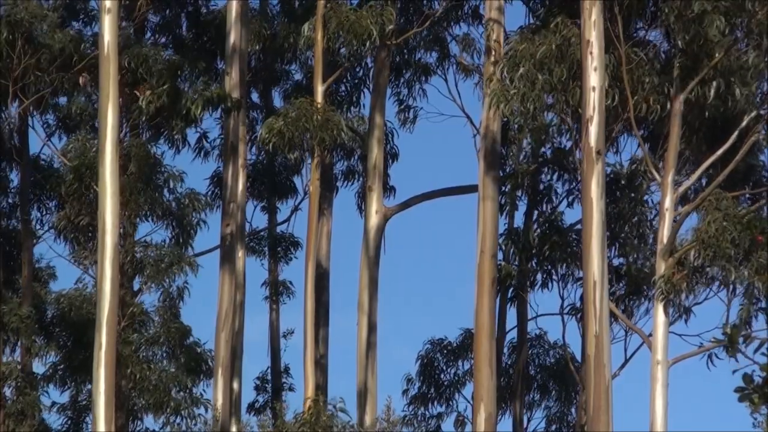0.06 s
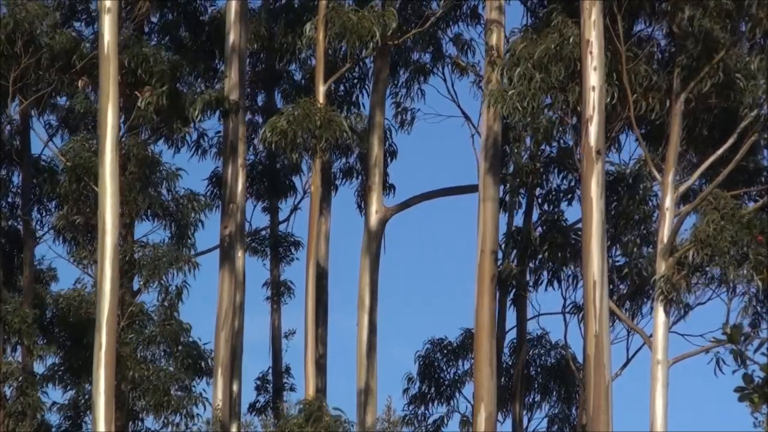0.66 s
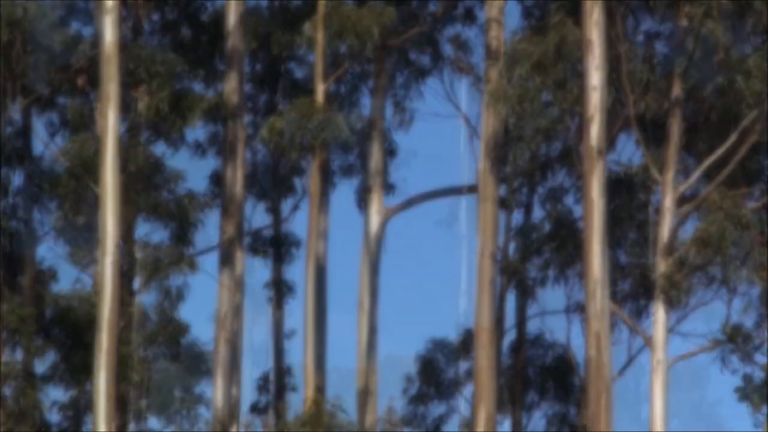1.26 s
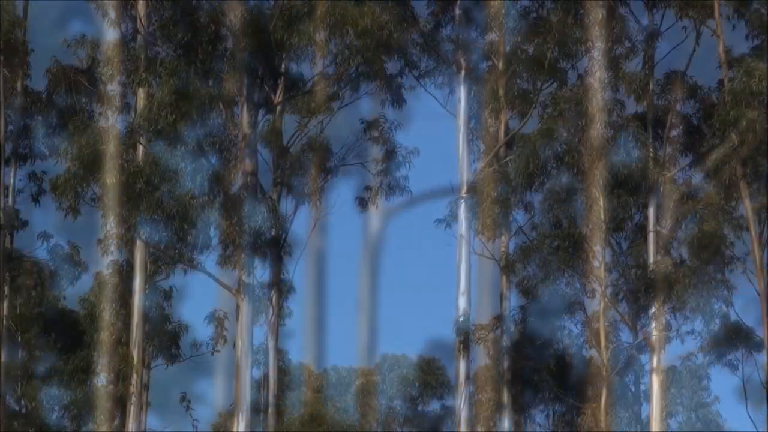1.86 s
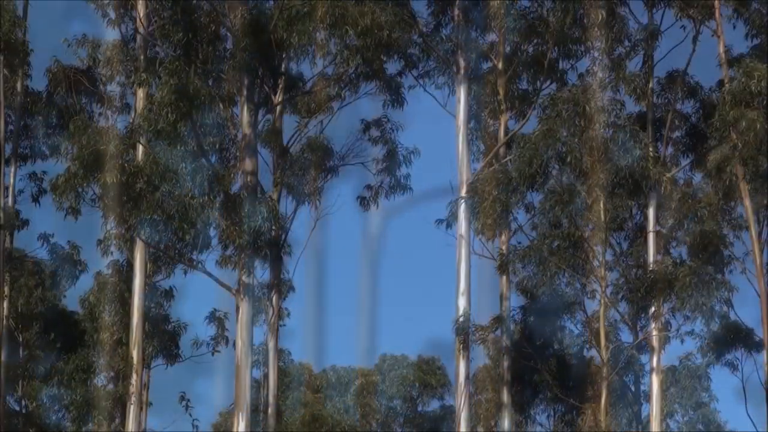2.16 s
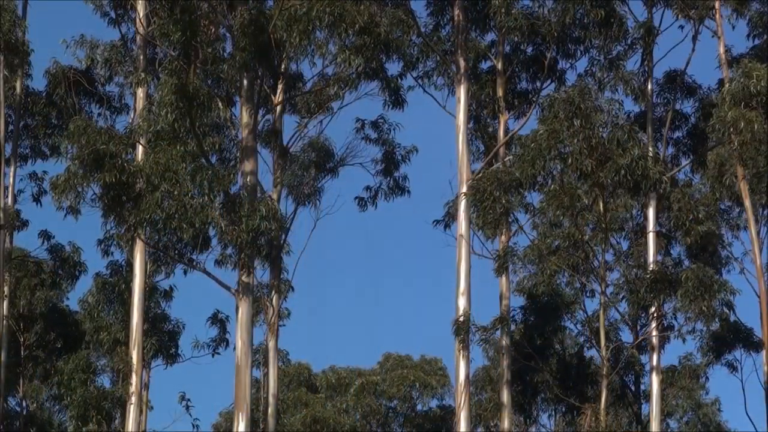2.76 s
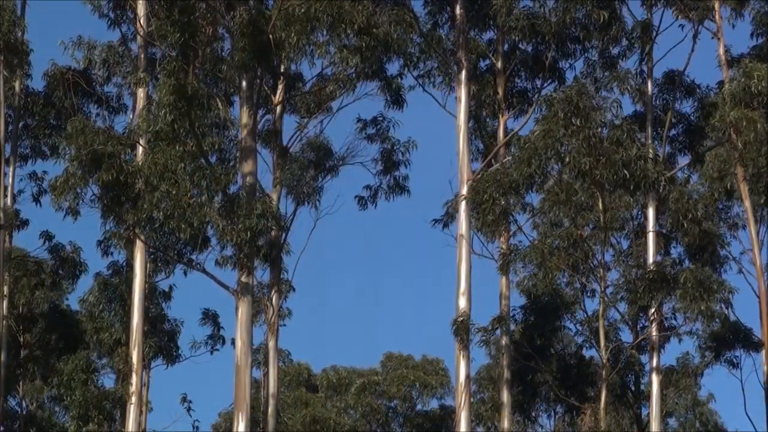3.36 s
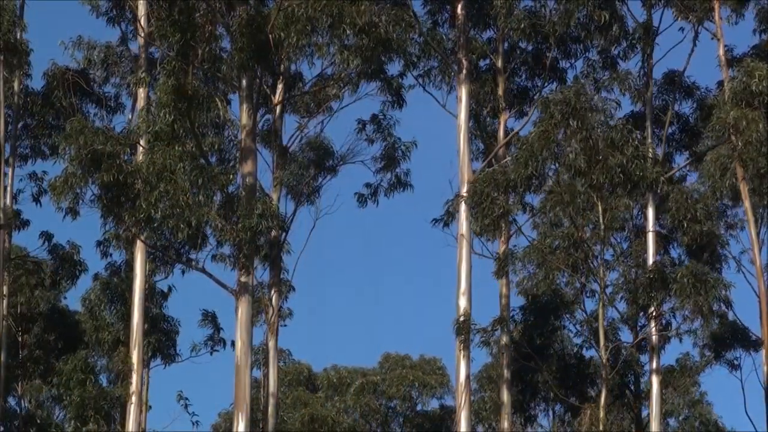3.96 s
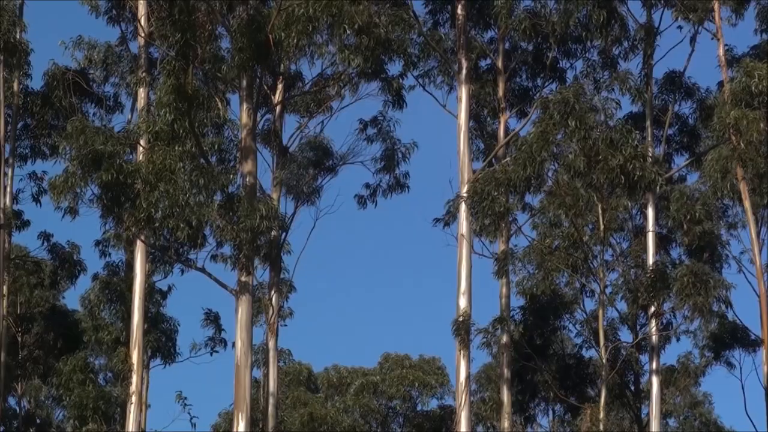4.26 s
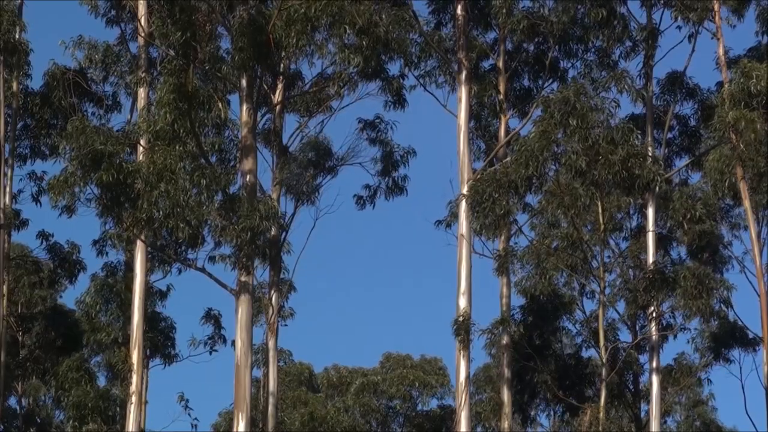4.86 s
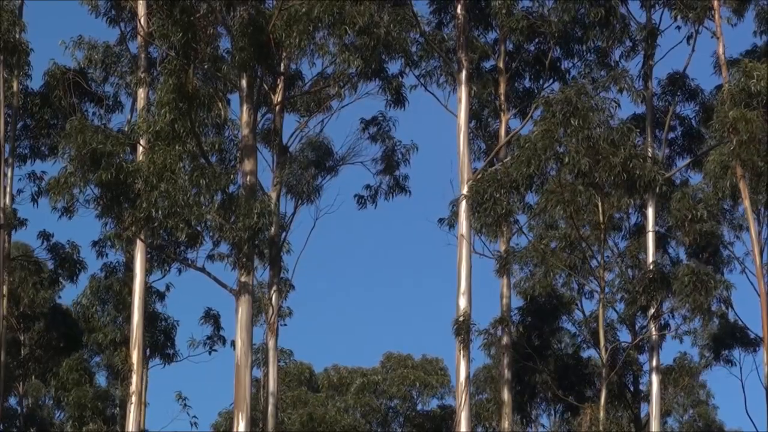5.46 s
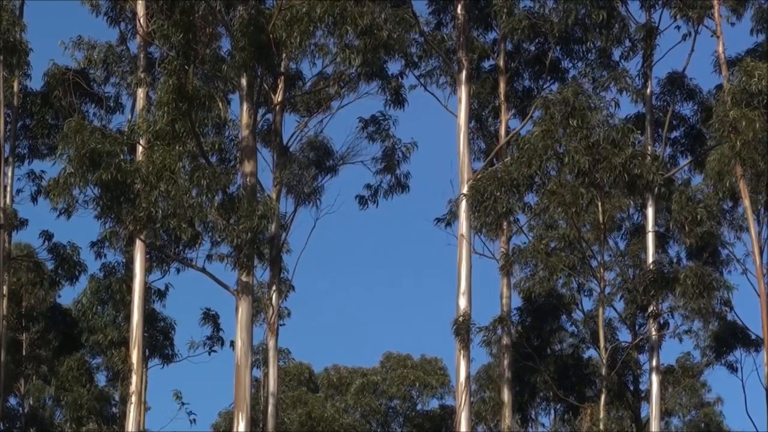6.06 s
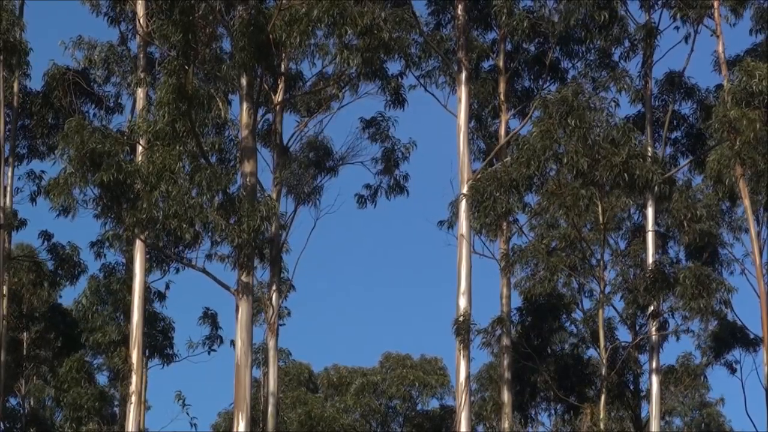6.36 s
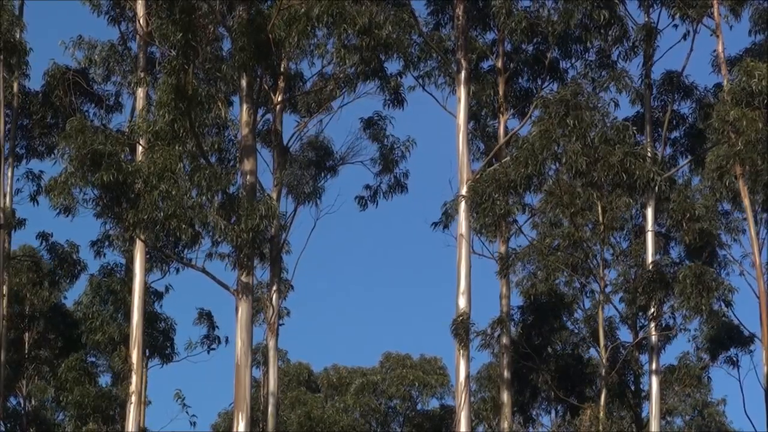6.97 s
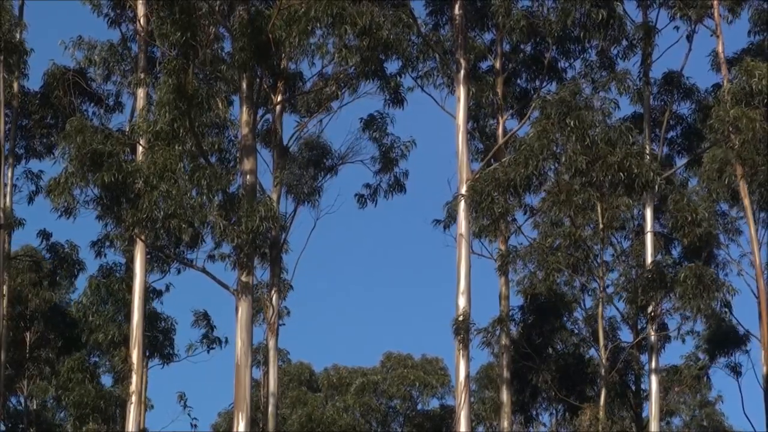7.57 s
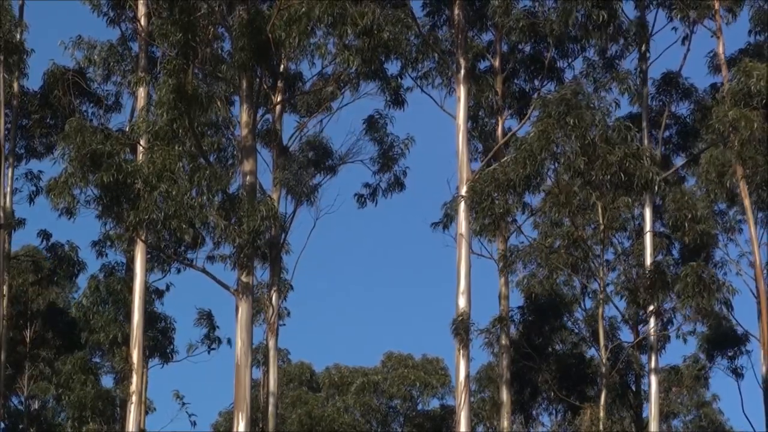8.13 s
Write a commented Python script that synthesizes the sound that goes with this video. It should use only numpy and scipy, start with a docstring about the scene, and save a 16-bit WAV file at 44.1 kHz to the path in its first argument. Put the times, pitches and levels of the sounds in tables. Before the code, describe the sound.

Faint birdsong and wind in tall trees fade out, then swell back with a rattle, four held whistles and raspy chips.

```python
"""Small birds under tall trees

A stereo pair stands in a wood, with a steady rush of wind and leaves in the crowns overhead.
Right of centre a bird rattles and slows into sharp tsips; ahead, one holds four long whistles and one
alternates harsh chips with low slurs. Others call around them, near and far. Each call is a tone swept
by the syrinx and scattered by leaves and trunks. All fades to silence early on, then slowly swells."""
import sys
import numpy as np
from scipy import signal
from scipy.io import wavfile

SR = 44100
rng = np.random.default_rng(int(sys.argv[2]) if len(sys.argv) > 2 else 0)


def wav_out(sig):
    """Save sig, one row per channel (or a flat mono array), as 16-bit PCM at SR to the path in sys.argv[1]."""
    wavfile.write(sys.argv[1], SR, np.round(np.clip(np.atleast_2d(sig).T, -1, 1) * 32767).astype(np.int16))


N = 361619
TIME = np.arange(N) / SR
# A call that rises and falls (time [s], pitch [Hz], level [dB])
ARCHED_CALL = [(0, 1570, -14.5), (.016, 1845, -4), (.030, 2170, -4), (0.044, 2466, -3), (.055, 2150, -2.5),
               (0.069, 1520, -11.5)]


def from_db(db):
    """Decibels to gain."""
    return 10 ** (np.asarray(db) / 20)


def rms_one(x):
    """Scale to rms 1."""
    return x / np.sqrt(np.mean(x ** 2) + 1e-20)


def at_hz(points, hz):
    """Read a table on a log-frequency axis."""
    known_hz, values = np.transpose(points)
    return np.interp(np.log(hz), np.log(known_hz), values)


def drift(rate, size=N):
    """A random wander of spread about 1 that turns rate times a second."""
    knots = np.arange(size) / SR * rate
    count = int(knots[-1]) + 2
    return np.interp(knots, np.arange(count), rng.standard_normal(count))


def gate(t, start, end, edge):
    """Open from start to end, with soft edges."""
    return np.sin(np.pi / 2 * np.clip(np.minimum(t - start, end - t) / edge, 0, 1)) ** 2


def stereo(mid, side, alike):
    """Two unrelated signals become a left and right of given likeness."""
    return np.sqrt(1 + alike) * mid + np.sqrt(1 - alike) * side * np.array([[1], [-1]])


def add(track, s, sound):
    """Mix a sound into a track at time s."""
    at = int(np.clip(s * SR, 0, N - 1))
    track[at:at + len(sound)] += sound[:N - at]


def air_noise(spectrum, low_hz, bands, patchy_db):
    """Half-octave bands of turbulence, each flickering on its own; rms 1."""
    # Stereo width: rumble and top hiss centred, middle wide (frequency [Hz], left-right likeness [0-1])
    likeness = [(40, 0.97), (120, 0.85), (250, 0.53), (500, 0.085), (1000, 0.024), (3000, 0.062),
                (7000, 0.49), (10000, 0.8), (14000, 1)]
    out, white = 0, rng.standard_normal((2, 2, N))
    for k in range(bands):
        edges = low_hz * np.sqrt(2) ** k * np.array([1, np.sqrt(2)])
        centre = np.sqrt(edges.prod())
        mid, side = signal.sosfilt(signal.butter(2, edges, "band", fs=SR, output="sos"), white[k % 2])
        level = from_db(at_hz(spectrum, centre) + patchy_db * drift(9))
        out = out + level * stereo(mid, side, at_hz(likeness, centre))
    return rms_one(out)


def wind_in_crowns():
    """Overhead, a low rush of wind and the fine hiss of leaves."""
    # Strength of the breeze (time [s], wind level [dB], leaf level [dB])
    breeze = [(0, -39.5, -44.5), (.7, -40.5, -48), (3.5, -43, -47.5), (4.2, -43.5, -51.5), (5.4, -43, -51),
              (6.4, -40, -48), (8.2, -41.5, -50)]
    # Spectra of wind and leaves (frequency [Hz], relative density [dB])
    wind_spectrum = [(15, -48), (25, -14.5), (149, -4.5), (222, -3), (266, -6), (338, -6.5), (536, -6),
                     (753, -10), (816, -9), (884, -10.5), (1190, -12), (2560, -20.5), (3000, -14),
                     (3900, -44), (6600, -120)]
    leaf_spectrum = [(1200, -10.5), (2000, 0), (3500, 0), (6000, -2), (9000, -7), (12500, -1.5),
                     (15500, -18)]
    s, wind_db, leaf_db = np.transpose(breeze)
    wind = air_noise(wind_spectrum, low_hz=25.9, bands=13, patchy_db=1)
    wind *= from_db(np.interp(TIME, s, wind_db) - .5)
    hiss = air_noise(leaf_spectrum, low_hz=1450, bands=7, patchy_db=.3)
    hiss *= from_db(np.interp(TIME, s, leaf_db) + 5)
    return (wind + hiss) * from_db([[-.1], [.1]])


def syllable(shape, stretch=1, rough=.01, overtone_db=-32):
    """The syrinx sweeps a nearly pure tone along a shape, never twice quite alike."""
    s, hz, db = np.transpose(shape)
    s = np.maximum.accumulate(s * stretch)
    t = np.arange(int(s[-1] * SR) + 2) / SR
    pitch = np.interp(t, s, hz) * (1 + rough * drift(500, size=len(t)))
    phase = 2 * np.pi * np.cumsum(pitch) / SR
    level = from_db(np.interp(t, s, db)) * gate(t, s[0], s[-1], edge=.0004)
    return level * (np.sin(phase) + from_db(overtone_db) * np.sin(2 * phase))


def runs(table, uneven_db=1.5):
    """Spell out runs as (time [s], level [dB]): gaps change steadily, levels a little unevenly."""
    events = []
    for start, count, gap, growth, first_db, last_db in table:
        k = np.arange(count)
        times = start + k * gap + k * (k - 1) / 2 * growth
        levels = np.linspace(first_db, last_db, len(k)) + uneven_db * rng.standard_normal(len(k))
        events += zip(times, levels)
    return events


def phrase(events, shape, gain_db, rough, overtone_db=-32):
    """A bird repeats one syllable at the given times and strengths."""
    out = np.zeros(N)
    for s, db, *stretch in events:
        call = syllable(shape, *stretch, rough=rough, overtone_db=overtone_db)
        add(out, s, from_db(db + gain_db) * call)
    return out


def in_forest(call, pan_db, wet_db, lead_s=0, trunk_db=-13.5, alike=.37):
    """A call arrives direct and off leaves and trunks; pan_db and lead_s favour the left microphone."""
    leaf_t60_s, trunk_t60_s = .098, .65
    t = np.arange(int(.8 * SR)) / SR
    decay = from_db(-60 * t / leaf_t60_s) + from_db(trunk_db - 60 * t / trunk_t60_s)
    paths = rng.standard_normal((2, len(t))) * (rng.random((2, len(t))) < .1)
    echoes = stereo(*paths, alike) * decay * (t > .0015)
    echoes /= np.sqrt(np.sum(echoes ** 2) / 2)
    left, right = call + from_db(wet_db) * signal.fftconvolve(call[None], echoes, axes=1)[:, :N]
    left = np.interp(TIME + lead_s, TIME, left)
    return np.array([left, right]) * from_db([[pan_db / 2], [-pan_db / 2]])


def swell(start, end, first_hz, last_hz, db):
    """The curve (time [s], pitch [Hz], level [dB]) of a gliding note that swells and sinks."""
    share = np.array([0, .69, 1])   # start, peak, end
    times = start + share * (end - start)
    pitches = first_hz + share * (last_hz - first_hz)
    return np.transpose([times, pitches, [db - 7.5, db, db - 8.5]])


def buzz(curve, pulse_hz, swing_hz, jitter, depth, overtone_db=-24):
    """A fast throb of the syrinx swings a tone in pitch and chops it into pulses."""
    s, hz, db = np.transpose(curve)
    throb = 2 * np.pi * np.cumsum(pulse_hz * (1 + jitter * drift(200))) / SR
    pitch = np.interp(TIME, s, hz) + swing_hz * (np.sin(throb) + .44 * drift(900))
    phase = 2 * np.pi * np.cumsum(pitch) / SR
    level = from_db(np.interp(TIME, s, db)) * gate(TIME, s[0], s[-1], edge=.0081)
    return level * (1 - depth * np.cos(throb)) * (np.sin(phase) + from_db(overtone_db) * np.sin(2 * phase))


def rattling_bird():
    """Right of centre, two rattles slow into tsips; ticks, a buzz and pips lead into the second."""
    # Syllables (time [s], pitch [Hz], level [dB])
    rattle_shape = [(0, 7600, -15.5), (.002, 7470, -4), (.005, 7350, 4), (.0064, 6570, -3.5),
                    (.0085, 5200, 0), (.011, 4700, -18.5), (.014, 4560, -20)]
    tsip_shape = [(0, 8700, -22.5), (.004, 7850, -8.5), (.008, 7050, -2), (0.0094, 6400, -12.5),
                  (0.012, 5350, -23)]
    tick_shape = [(0, 3180, -15), (.0035, 4400, -11), (.007, 4800, 5), (.011, 5100, -5)]
    pip_shape = [(0, 8440, -15), (.002, 7580, 1), (.005, 7300, -4), (.008, 6900, -14)]
    # Runs (start [s], count, first gap [s], gap growth [s], first level [dB], last level [dB])
    rattle_runs = [(.001, 10, .0158, 0, -15, -14), (2.855, 3, .023, 0, -15.5, -15),
                   (2.868, 2, .022, 0, -22, -20), (3.043, 12, .0155, 0, -21.5, -17)]
    tsip_runs = [(.1665, 5, .0288, .0038, -10.5, -12), (.4155, 6, .0488, 0, -16, -15),
                 (3.238, 5, .0328, .0014, -13.5, -13.5), (3.483, 6, .0465, .0006, -16, -14)]
    pip_runs = [(2.752, 4, 0.01, .004, -28, -17), (2.930, 4, .0155, 0, -20, -18)]
    # Quickening ticks (time [s], level [dB])
    tick_times = [(1.7848, -19.5), (1.9223, -16.5), (2.039, -21), (2.141, -21), (2.2174, -18),
                  (2.2847, -17.5), (2.3476, -19), (2.4077, -23.5), (3.0225, -23.5)]
    # Buzzed notes (start [s], end [s], first pitch [Hz], last pitch [Hz], level [dB])
    low_notes = [(2.467, 2.651, 4860, 4710, -33), (2.622, 2.723, 4630, 4740, -30),
                 (2.71, 2.846, 5200, 5090, -29), (2.877, 3.005, 5380, 5340, -29)]
    high_notes = [(2.684, 2.833, 7150, 7160, -31.5)]
    ticks = phrase(tick_times, tick_shape, gain_db=-4.5, rough=.034)
    low = sum(buzz(swell(*note), pulse_hz=332, swing_hz=364, jitter=.083, depth=.23, overtone_db=-17)
              for note in low_notes)
    high = sum(buzz(swell(*note), pulse_hz=110, swing_hz=250, jitter=.28, depth=.5)
               for note in high_notes)
    rattle = phrase(runs(rattle_runs), rattle_shape, gain_db=-5, rough=.03, overtone_db=-18.5)
    pips = phrase(runs(pip_runs), pip_shape, gain_db=-7.5, rough=.019)
    beak_lowpass = signal.butter(2, 11000, fs=SR, output="sos")
    tsips = phrase(runs(tsip_runs), tsip_shape, gain_db=-3, rough=.011)
    return (in_forest(signal.sosfilt(beak_lowpass, rattle + pips), pan_db=-4, wet_db=2, lead_s=5.1e-6)
            + in_forest(ticks, pan_db=-4, wet_db=-5.5, lead_s=36e-6)
            + in_forest(low + high, pan_db=-2.5, wet_db=3, lead_s=16e-6)
            + in_forest(tsips, pan_db=-4, wet_db=1, lead_s=9.9e-6))


def sliding_notes(notes, octaves, rough):
    """Each note slides through its middle pitch, fastest at first, and dips once in level."""
    out, share = np.zeros(N), np.array([0, .2, .5, 1])
    bend = 2 ** (octaves * (share ** .75 - .5 ** .75))
    for s, length, hz, db in notes:
        shape = np.transpose([length * share, hz * bend, [1, -3.5, 1.5, -6]])
        add(out, s, from_db(db) * syllable(shape, rough=rough))
    return out


def neighbouring_birds():
    """Low chucks, sliding notes, bright sparks and arched calls from the trees on the right."""
    # Syllables (time [s], pitch [Hz], level [dB])
    chuck_shape = [(0, 2980, -3), (.003, 2610, -4), (.007, 2300, -1.5), (.010, 1950, 0.5),
                   (.014, 1580, -7.5), (.018, 1230, -14.5)]
    spark_shape = [(0, 8190, -5), (.007, 7480, 5), (.010, 7610, -25), (.0105, 3840, -27), (0.014, 4300, -1),
                   (.017, 5690, 6), (.021, 7250, -1)]
    # Runs (start [s], count, first gap [s], gap growth [s], first level [dB], last level [dB])
    chuck_runs = [(.062, 4, .0842, 0.0011, -23, -25), (.413, 7, .0895, 0.00071, -26, -26)]
    spark_runs = [(6.6934, 4, .061, -.003, -38, -37)]
    # Arched calls (time [s], level [dB], stretch [ratio])
    arch_times = [(7.728, -29, 1), (7.878, -28.5, 1)]
    # Lone slides (time [s], length [s], middle pitch [Hz], level [dB])
    falling_notes = [(.147, .03, 3760, -34), (.183, 0.018, 4360, -30), (1.872, .014, 5400, -34),
                     (1.962, .014, 5530, -34), (2.063, .026, 1420, -41.5), (2.26, 0.007, 3100, -30),
                     (2.288, 0.0081, 2850, -34), (2.316, 0.02, 2060, -39), (3.428, 0.012, 5300, -25),
                     (3.447, .01, 6400, -26), (3.79, 0.01, 6770, -31), (4.73, 0.0089, 2560, -38),
                     (5.568, .029, 3580, -41), (5.785, 0.018, 1450, -34), (6.282, 0.039, 3750, -42),
                     (7.44, 0.091, 3935, -38.5), (8.018, 0.016, 4720, -41)]
    rising_notes = [(.236, 0.026, 4130, -29.5), (.349, 0.029, 5400, -26.5), (1.042, 0.0075, 5670, -30.5),
                    (2.437, 0.008, 7700, -24), (3.423, 0.0079, 5260, -25), (4.949, 0.11, 4230, -51),
                    (6.935, .0075, 5260, -41)]
    chucks = phrase(runs(chuck_runs), chuck_shape, gain_db=-1.5, rough=.063)
    arches = phrase(arch_times, ARCHED_CALL, gain_db=-2, rough=.021)
    sparks = phrase(runs(spark_runs), spark_shape, gain_db=-4.5, rough=.0076)
    falls = sliding_notes(falling_notes, octaves=-.39, rough=.013)
    rises = sliding_notes(rising_notes, octaves=.36, rough=.024)
    return (in_forest(chucks + arches, pan_db=-5, wet_db=-5.5, lead_s=88e-6)
            + in_forest(falls + rises + sparks, pan_db=-4.5, wet_db=-5, lead_s=25e-6))


def distant_birds():
    """Deep among the trees: warbles, chatter and peeps to the right, a trill and steep slides ahead."""
    # Low warbles and syllables (time [s], pitch [Hz], level [dB])
    warble_curves = [
        [(2.112, 1800, -32), (2.132, 2085, -38), (2.148, 1956, -35), (2.160, 1600, -39)],
        [(4.33, 1670, -47), (4.36, 1850, -47), (4.395, 1930, -43), (4.43, 1850, -45), (4.45, 1650, -54.5)],
    ]
    upslur_shape = [(0, 1495, -21), (.010, 1830, -1.5), (0.015, 2000, 2), (.022, 2300, -24)]
    chit_shape = [(0, 3520, -16), (.002, 3150, 0.5), (.005, 2870, 0.5), (.01, 2370, -8)]
    peep_shape = [(0, 4300, -12), (.005, 3590, 1), (.012, 3510, 3), (0.021, 3750, -8), (.027, 3380, -10)]
    # Runs (start [s], count, first gap [s], gap growth [s], first level [dB], last level [dB])
    chatter_runs = [(2.520, 3, .0465, 0, -37.5, -39.5), (2.823, 2, .05, 0, -37.5, -41)]
    peep_runs = [(5.06, 2, .022, 0, -40, -42), (5.188, 3, 0.058, 0.0044, -41, -40.5),
                 (8.033, 4, .036, -.0015, -32.5, -37.5)]
    # Coarse trill (start [s], end [s], first pitch [Hz], last pitch [Hz], level [dB])
    trill_notes = [(6.969, 7.111, 4970, 4750, -42), (7.096, 7.22, 4930, 5050, -45.5),
                   (7.217, 7.555, 5260, 5430, -48)]
    # Steep slides (time [s], length [s], middle pitch [Hz], level [dB])
    slide_notes = [(6.905, 0.043, 3410, -44), (7.072, 0.039, 3100, -45.5), (7.235, .04, 3090, -44.5)]
    trill = sum(buzz(swell(*note), pulse_hz=92.5, swing_hz=385, jitter=.0516, depth=.72)
                for note in trill_notes)
    peeps = phrase(runs(peep_runs), peep_shape, gain_db=-2.5, rough=.03)
    warbles = sum(buzz(curve, pulse_hz=42, swing_hz=147, jitter=.0854, depth=.31)
                  for curve in warble_curves)
    upslurs = phrase(runs(chatter_runs), upslur_shape, gain_db=-2, rough=.025)
    chit_times = [(s + .0295, db + 9) for s, db in runs(chatter_runs)]   # one after each upslur
    chits = phrase(chit_times, chit_shape, gain_db=-2, rough=.017)
    slides = sliding_notes(slide_notes, octaves=-1.05, rough=.0305)
    return (in_forest(trill + slides, pan_db=2, wet_db=-2)
            + in_forest(peeps + warbles + upslurs + chits, pan_db=-7.5, wet_db=-2.5, lead_s=35e-6))


def held_tone(curve, waver, flutter_db):
    """A long whistle that trembles slightly in pitch and strength."""
    s, hz, db = np.transpose(curve)
    pitch = np.interp(TIME, s, hz) * (1 + waver * drift(90))
    level = from_db(np.interp(TIME, s, db) + flutter_db * drift(45)) * gate(TIME, s[0], s[-1], .0019)
    return np.sqrt(2) * level * np.sin(2 * np.pi * np.cumsum(pitch) / SR)


def whistling_birds():
    """Four near whistles ring among the trunks and one sinks on the right, with faint tones above."""
    # Whistles (time [s], pitch [Hz], level [dB])
    near_curves = [
        [(3.6, 2820, -51), (3.661, 2784, -42), (3.673, 2870, -47), (3.694, 2770, -43), (3.731, 2797, -41.5),
         (3.763, 2724, -35), (3.882, 2766, -36.5), (3.898, 2789, -39), (3.918, 2860, -48)],
        [(4.17, 2860, -57), (4.227, 2747, -36.5), (4.309, 2860, -52), (4.317, 2825, -40), (4.468, 2825, -36),
         (4.533, 2776, -33), (4.615, 2900, -44), (4.623, 2914, -34.5), (4.648, 2950, -66)],
        [(4.86, 2840, -49), (4.913, 2880, -42), (5.06, 2850, -46.5), (5.109, 2790, -30.5), (5.138, 2820, -39.3),
         (5.154, 2820, -30.8), (5.219, 2824, -36.5), (5.24, 3010, -35.5), (5.268, 2860, -63)],
        [(5.37, 2930, -46), (5.415, 2930, -36.3), (5.472, 2930, -34), (5.574, 2890, -41.5),
         (5.603, 2935, -27.5), (5.635, 2880, -42.5), (5.656, 3010, -31), (5.713, 2910, -53),
         (5.717, 2954, -51.2)],
    ]
    sinking_curve = [(7.585, 3070, -35), (7.595, 2884, -31), (7.611, 2850, -35), (7.621, 2750, -33.5),
                     (7.647, 2720, -32.5), (7.667, 2655, -42), (7.68, 2704, -47)]
    # Faint high tones; the last is the sinking whistle's overtone, an octave above it
    # (start [s], end [s], first pitch [Hz], last pitch [Hz], level [dB])
    faint_tones = [(4.62, 4.86, 7870, 7930, -58), (4.88, 4.99, 7950, 7850, -53.5),
                   (4.7, 4.96, 7170, 7200, -59), (5.43, 5.53, 8900, 8150, -50.5),
                   (5.53, 5.72, 8150, 7650, -50.5), (7.3, 7.43, 6950, 7150, -55),
                   (7.6, 7.72, 5540, 5600, -56)]
    near = sum(held_tone(curve, waver=.004, flutter_db=1.6) for curve in near_curves)
    near = in_forest(near, pan_db=1.7, wet_db=-6.5, trunk_db=6)
    faint = sum(held_tone(swell(*tone), waver=.012, flutter_db=2) for tone in faint_tones)
    sinking = held_tone(sinking_curve, waver=.004, flutter_db=-.5)
    return (near + from_db(1.5) * in_forest(faint, pan_db=-6, wet_db=3.5)
            + in_forest(sinking, pan_db=-7, wet_db=-6, lead_s=42e-6))


def chipping_bird():
    """Straight ahead, a twitter and an arched call lead into raspy two-voiced chips and low slurs."""
    # Syllables (time [s], pitch [Hz], level [dB])
    twitter_shape = [(0, 5290, 1.5), (.006, 6980, -6), (0.01, 5990, -7), (0.017, 4700, -1.5),
                     (.021, 3450, -10)]
    upper_shape = [(0, 3730, -10), (.005, 4970, -8.5), (.010, 6140, -4.5), (.014, 6600, -16),
                   (.022, 6670, -20), (.026, 6120, 2), (.029, 5300, -5), (.032, 4510, 0.5),
                   (0.036, 3340, -12)]
    lower_shape = [(.002, 3207, -24), (.009, 4390, -10), (0.017, 4650, -17), (.024, 4670, -16)]
    slur_shape = [(0, 2805, -7), (.005, 3280, -10), (.008, 3130, -6), (.010, 2383, -5.5), (0.017, 2304, 0),
                  (0.019, 2525, -1.5), (.024, 1985, -5), (.031, 1500, -5)]
    # Runs (start [s], count, first gap [s], gap growth [s], first level [dB], last level [dB])
    chip_runs = [(5.8668, 5, .1584, .0014, -22.5, -23.5)]
    slur_runs = [(5.9398, 4, .16, .0017, -24.5, -26.5)]
    # Loose syllables (time [s], level [dB]; for the arch also stretch [ratio])
    twitter_times = [(5.605, -31.5), (5.648, -32), (5.6754, -36.5), (5.741, -33), (5.7774, -36),
                     (5.7954, -33.5), (5.8156, -34.5)]
    opening_arch = [(5.736, -20.5, .53)]
    closing_slur = [(6.6028, -30.5)]
    twitter = phrase(twitter_times, twitter_shape, gain_db=-5, rough=.065)
    upper = phrase(runs(chip_runs), upper_shape, gain_db=-3, rough=.032, overtone_db=-23)
    lower = phrase(runs(chip_runs), lower_shape, gain_db=1.5, rough=.028)
    rasp_band = signal.butter(2, [7500, 13500], "band", fs=SR, output="sos")
    rasp = from_db(-16.5) * np.abs(upper) * rms_one(signal.sosfilt(rasp_band, rng.standard_normal(N)))
    slurs = phrase(runs(slur_runs) + closing_slur, slur_shape, gain_db=0, rough=.019)
    arch = phrase(opening_arch, ARCHED_CALL, gain_db=-3, rough=.034)
    return (in_forest(twitter + upper + lower + rasp, pan_db=-.7, wet_db=1, trunk_db=-17, alike=.68)
            + in_forest(slurs + arch, pan_db=.5, wet_db=-5.5, lead_s=10e-6, trunk_db=-14, alike=.68))


def scene():
    """Birds and wind together."""
    return (rattling_bird() + whistling_birds() + chipping_bird() + neighbouring_birds()
            + distant_birds() + wind_in_crowns())


def record(dry):
    """Everything fades to silence and slowly swells again; the top treble is cut steeply."""
    # Overall fade (time [s], gain [ratio])
    fade = [(0, .2), (1.54, 0), (1.62, 0), (8.2, 1)]
    faded = dry * np.interp(TIME, *np.transpose(fade))
    return signal.sosfilt(signal.ellip(12, .1, 80, 15900, fs=SR, output="sos"), faded)


dry = scene()
out = record(dry)
wav_out(out)
```